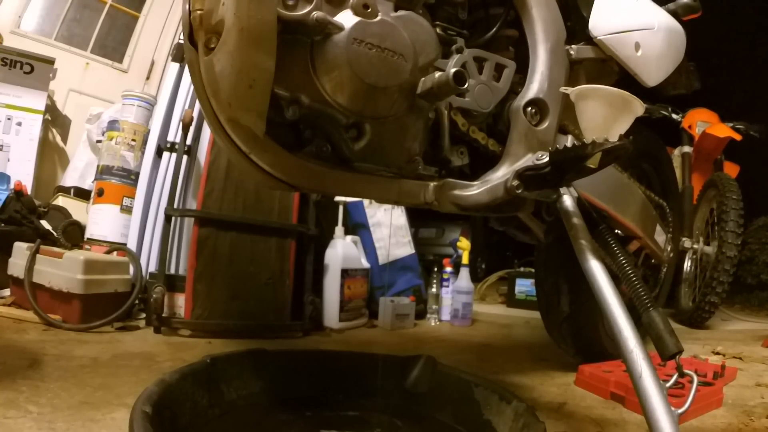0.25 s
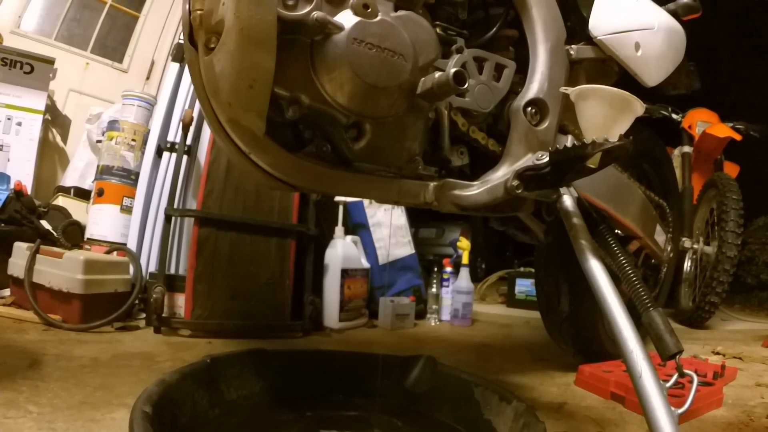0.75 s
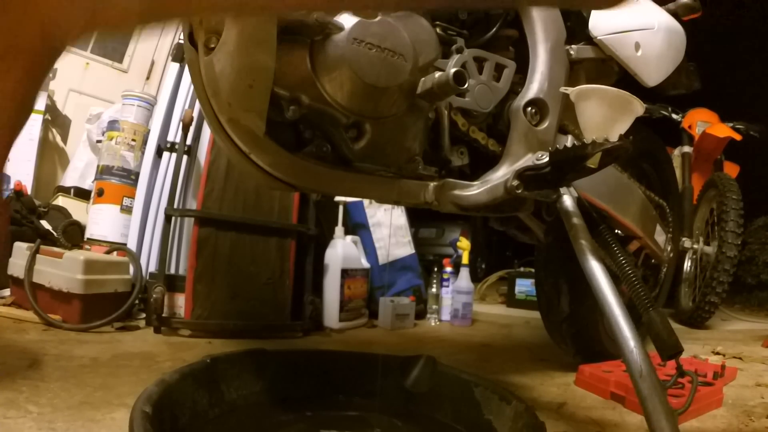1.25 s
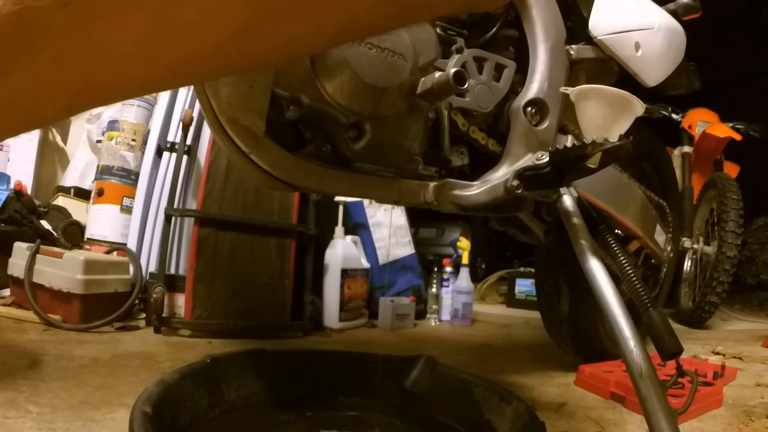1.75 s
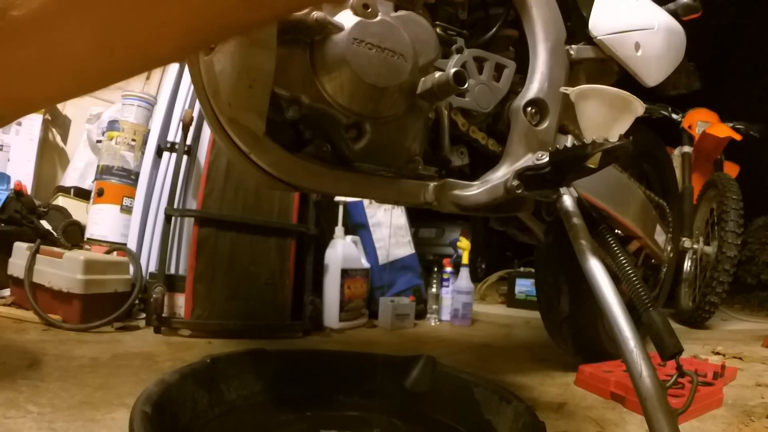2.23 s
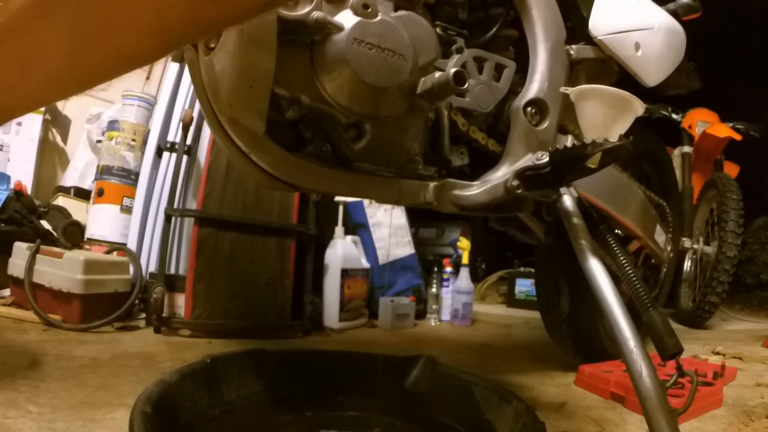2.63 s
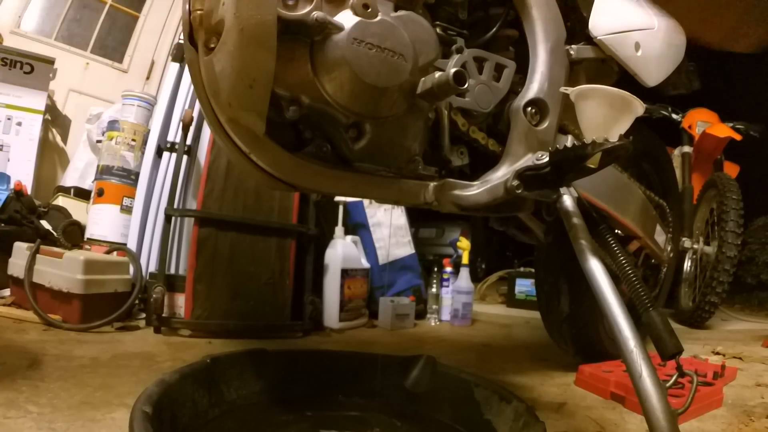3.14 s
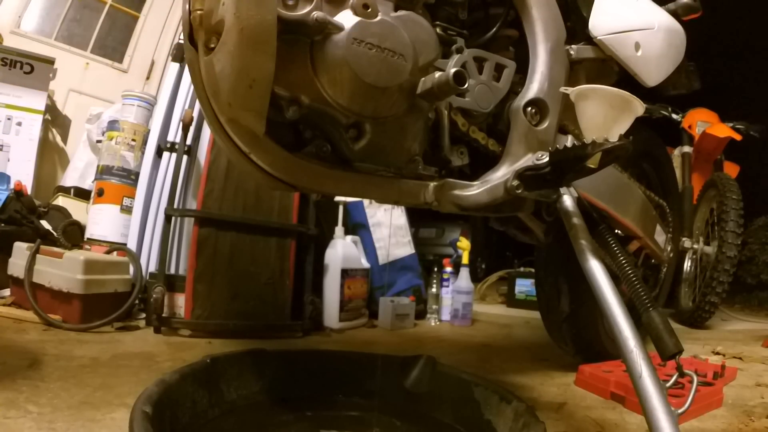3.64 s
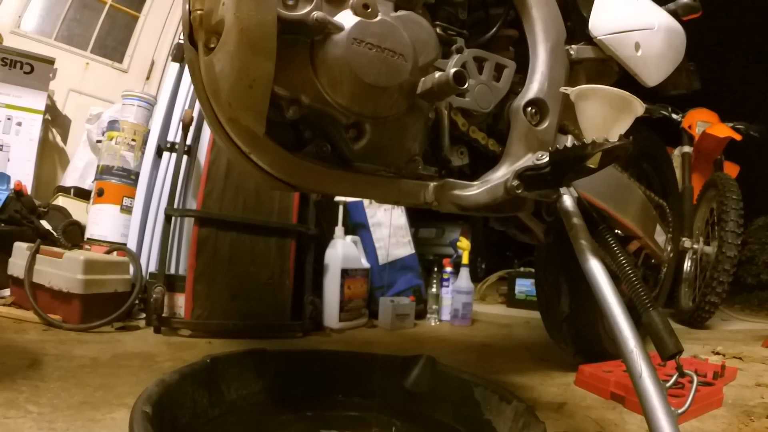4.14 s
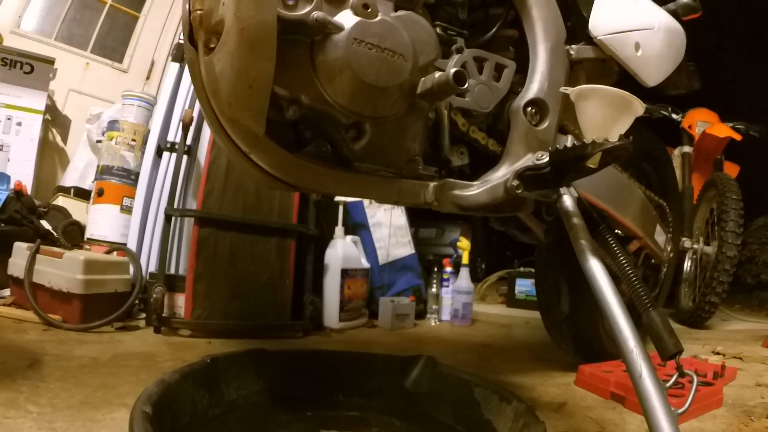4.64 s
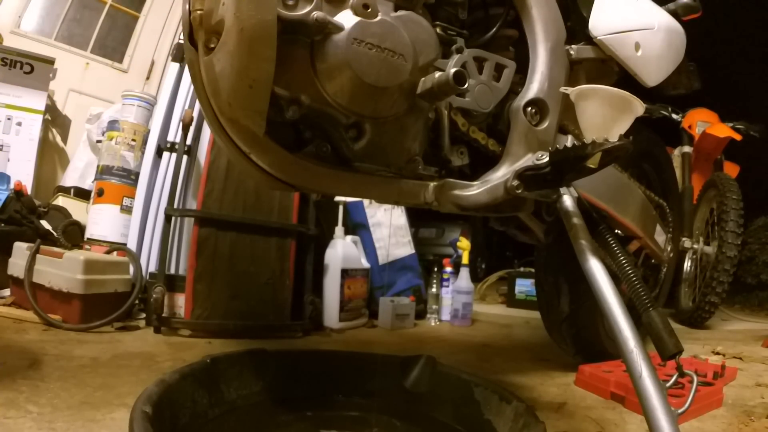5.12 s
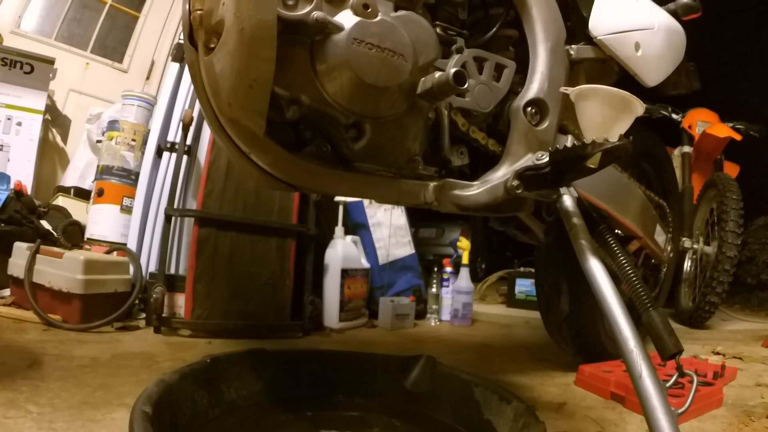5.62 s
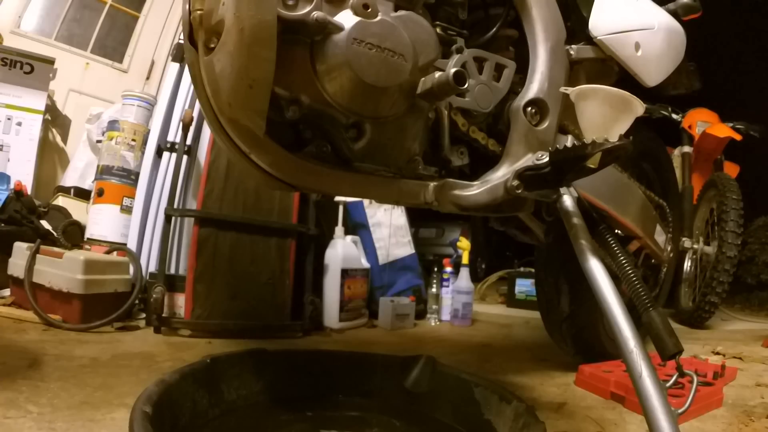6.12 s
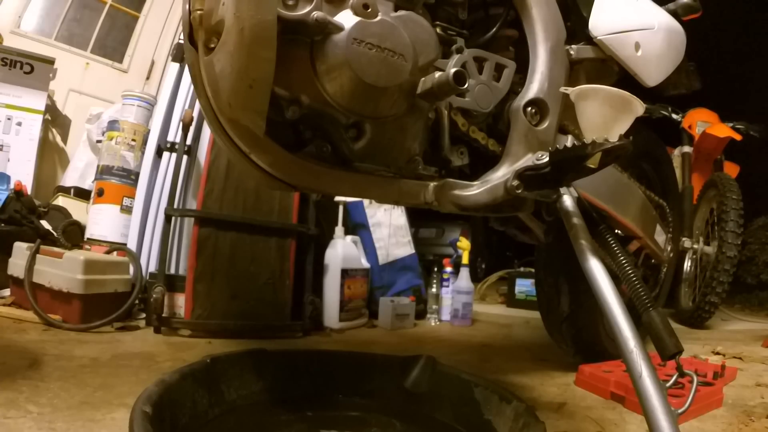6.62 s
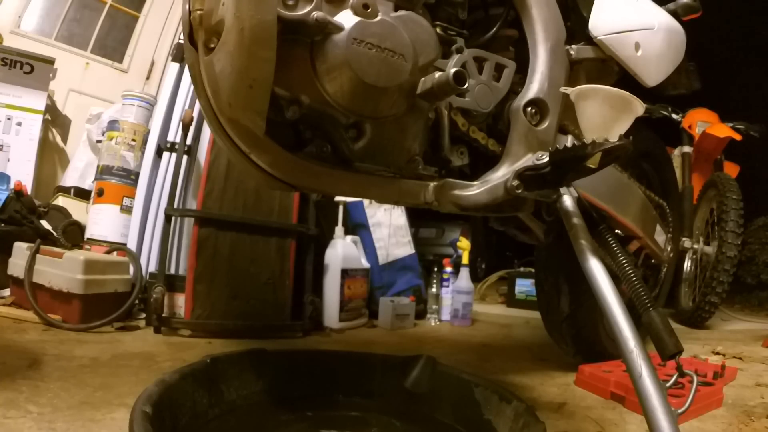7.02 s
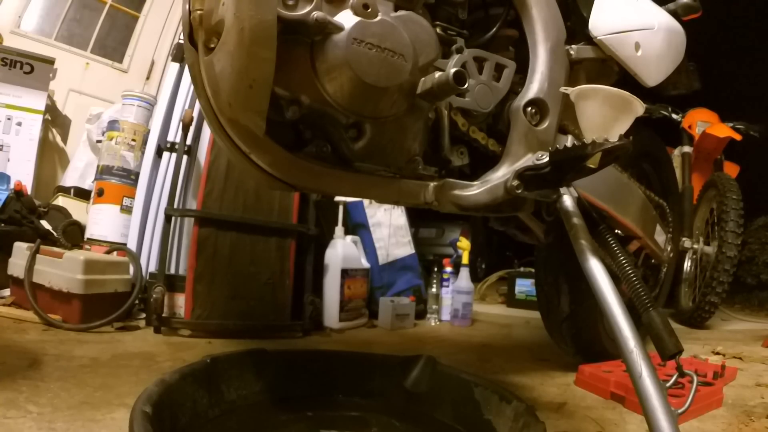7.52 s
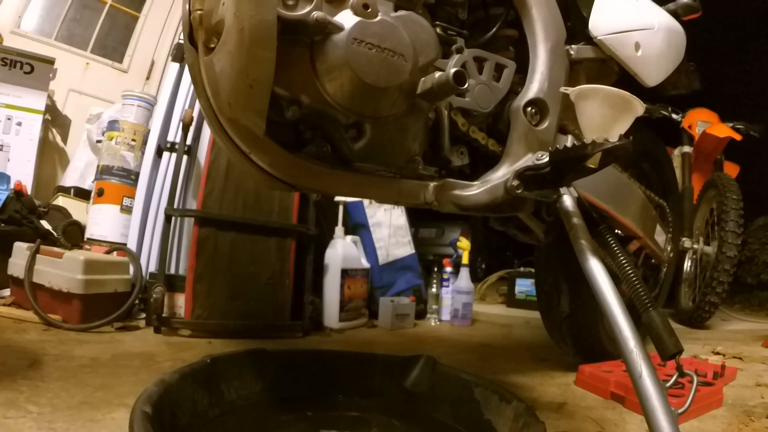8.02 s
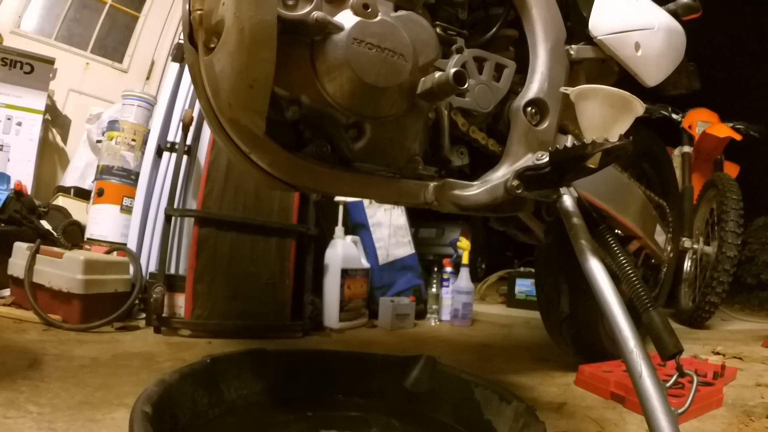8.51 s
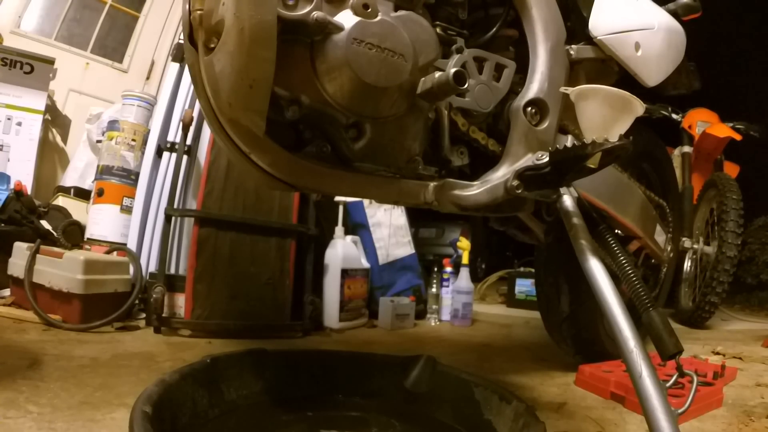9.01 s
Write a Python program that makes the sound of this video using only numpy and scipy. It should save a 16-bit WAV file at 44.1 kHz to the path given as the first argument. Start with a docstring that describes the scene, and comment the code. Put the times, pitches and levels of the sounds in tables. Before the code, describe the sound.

Oil trickles in fast hollow drops in a quiet garage as a steel tool lands and rings, plastic snaps, and a low hum swells.

```python
"""Oil is poured from a plastic jug into a motorcycle engine, above a drain pan in a quiet garage.
From the start it trickles as many small drops, each a noise impact ringing a hollow whose pitch climbs overall,
with hands rubbing and bumping (filtered grit), a low hum (two sines) and room air (shaped noise).
Soon knocks and scuffs begin (damped noise) and a steel tool lands and rings (decaying sines) amid puffs of air;
later plastic snaps (noise bursts), a faint hollow tone passes (filtered noise), and the hands come to rest."""
import sys
import numpy as np
from scipy import signal
from scipy.fft import rfft, irfft
from scipy.io import wavfile
from scipy.ndimage import uniform_filter1d

SR = 44100
rng = np.random.default_rng(int(sys.argv[2]) if len(sys.argv) > 2 else 0)


def transcribe(u):
    """Save the signal u as a 16-bit wav file named by the first command-line argument.

    u: samples, shape (n,) or (channels, n), limited to [-1, 1]; the rate is SR.
    q: integer samples, one column per channel.
    """
    v = np.clip(np.atleast_2d(u).T, -1, 1)
    q = np.round(v * 32767).astype(np.int16)
    wavfile.write(sys.argv[1], SR, q)


N = 408366
TIME = np.arange(N) / SR

# All spectra and all levels called relative are shifted by gains in the functions.
# distinct drips: [t/s, relative hollow level/dB, relative splash level/dB]
DISTINCT_DRIPS = [(.1174, -40, -49), (.7526, -35, -48), (1.0264, -61, -42.5), (1.2106, -38.5, -61),
                  (1.6275, -42, -43.5), (1.7185, -39, -41.5), (2.172, -38, -50), (2.4057, -40, -60),
                  (2.8384, -42, -61), (2.9234, -41.5, -62), (3.1326, -47, -54), (3.336, -68, -47.5),
                  (3.3563, -58, -41.5), (3.374, -60, -37.5), (3.3873, -62, -49), (3.6361, -43, -48.5),
                  (4.2775, -44, -51), (4.558, -45, -52), (4.7207, -39, -53), (4.7633, -47.5, -54),
                  (4.8648, -52, -54), (4.9232, -66, -54), (5.1876, -47, -55), (5.3632, -41, -57),
                  (5.3913, -44.5, -53), (5.4495, -46, -54), (5.4949, -41.5, -58), (5.7452, -53, -51),
                  (6.0048, -50, -51), (6.077, -49, -53.5), (6.631, -48.5, -63), (6.7156, -49, -56),
                  (6.8332, -41, -51), (6.982, -49.5, -53.5), (7.0364, -50, -67), (7.0882, -46, -55),
                  (7.101, -45, -57), (7.1407, -48, -61), (7.1896, -48, -51), (7.1993, -45, -57),
                  (7.265, -48.5, -66), (7.3447, -42, -53), (7.3986, -44.5, -61), (7.4716, -48.5, -69),
                  (7.6434, -45, -53), (7.6715, -47, -57), (7.6889, -39, -54), (7.8334, -48, -51),
                  (7.8785, -47, -49.5), (7.9136, -49, -54), (7.9603, -47, -51), (8.0388, -51, -55),
                  (8.23, -45, -53.5), (8.327, -48, -65), (8.5121, -48.5, -63), (8.5584, -50, -61),
                  (8.8453, -49.5, -70), (9.047, -54, -62), (9.2373, -66, -56)]
# resonances of the hollow that the oil falls into: [t/s, main f/Hz, upper f/Hz]
HOLLOW_PITCH = [(0, 2050, 3400), (1.4, 2240, 3340), (3.2, 2265, 3580), (3.42, 2870, 3840),
                (3.65, 2330, 3520), (3.86, 1640, 3880), (4.05, 2370, 5340), (4.3, 2570, 3300),
                (4.7, 2890, 3640), (5.1, 2880, 3830), (6.25, 3070, 4050), (6.75, 3830, 3900),
                (7.2, 3550, 3800), (9.26, 3630, 3810)]
# those two modes in a thin flow, main then upper: [width of one filter pass/Hz, relative level/dB]
HOLLOW_MODES = [(320, 0), (650, -4)]
# spectrum of bright splashes and sharp edges: [f/Hz, relative level/dB]
BRIGHT_SPECTRUM = [(300, -47), (1500, -52.5), (2600, -9), (4300, 3), (5600, 0.5), (6800, 6.5), (7400, 2),
                   (8200, 6), (10500, 2.5), (12500, 0.5), (15000, -7)]
# strength of the oil flow: [t/s, relative level of the small drops/dB]
OIL_FLOW = [(0, -57), (.7, -53), (2.2, -52), (2.6, -57), (3, -53), (3.25, -61), (3.8, -52), (4.15, -60),
            (5.45, -61), (5.7, -66), (6.1, -62), (6.55, -68), (6.8, -61.5), (7.9, -60.5), (8.6, -68),
            (9.26, -64)]
# fidgeting of hands, sleeves and jug: [t/s, relative friction level/dB, relative thud level/dB]
FIDGETING = [(0, -64, -66.5), (.6, -59, -50), (1.7, -64.5, -61), (2.5, -69.5, -75.5), (3.7, -68, -58.5),
             (4.8, -69.5, -76), (5.7, -74, -70)]
# nudges of the jug: [t/s, relative friction level/dB, relative thud level/dB]
JUG_NUDGES = [(.43, -42, -37), (.58, -67, -56), (.77, -56.5, -55), (1.25, -52, -47), (1.42, -61, -47),
              (2.15, -65, -65), (3.06, -62.5, -55), (3.149, -62.5, -54.5), (3.52, -55.5, -54),
              (3.81, -56, -51.5), (4.39, -58, -45.5), (4.68, -97, -49.5)]
# spectrum of friction: [f/Hz, relative level/dB]
RUB_SPECTRUM = [(150, -25), (500, 2), (1400, 0), (3000, -2), (6000, -6), (9000, -9), (15000, -15.5)]
# spectrum of dull bumps: [f/Hz, relative level/dB]
THUD_SPECTRUM = [(20, 4.5), (60, 6.5), (110, 1.5), (180, 1), (330, -1), (500, -17), (1200, -43.5)]
# level of the hum: [t/s, level/dB]
HUM_LEVEL = [(0, -60), (1.3, -61), (2.5, -78), (3.7, -60), (5.2, -57), (5.9, -49.5), (6.9, -52),
             (7.5, -50.5), (9.26, -53)]
# pitch of the hum, sagging as it grows louder: [t/s, f/Hz]
HUM_PITCH = [(5, 90.4), (5.9, 88.7), (9.26, 88)]
# spectrum of the garage air: [f/Hz, relative level per Hz/dB]
AIR_SPECTRUM = [(15, 7.5), (25, -1), (42, -7), (70, -7.5), (110, -10.5), (170, -16), (250, -26.5),
                (500, -29), (1100, -32.5), (2200, -36), (5000, -38.5), (10000, -42), (12000, -36),
                (15500, -38.5)]
# knocks, with a rub at 1.24 s and the ringing of flexing plastic at 2.08 and 2.10 s: [t/s, thump level/dB,
# thump f/Hz, thump T60/s, relative clack level/dB, clack T60/s]
CONTACT_EVENTS = [(0.2508, -42.5, 716, 0.082, -27.5, 0.032), (.565, -46, 320, 0.026, -44.5, .03),
                  (0.785, -45, 162, .055, -52, .03), (.843, -44, 597, 0.054, -40, 0.048),
                  (1.24, -48.5, 303, 0.29, -50, 0.15), (2.081, -40, 1960, .023, -55, .02),
                  (2.1034, -34.5, 1920, 0.02, -56, .02), (3.141, -52.5, 187, 0.088, -54, .032),
                  (3.4967, -40.5, 170, .15, -44, .06), (3.684, -47, 634, .11, -44.5, 0.027),
                  (3.725, -49, 620, 0.14, -45, 0.067), (3.843, -48, 625, 0.19, -46, 0.084),
                  (3.859, -46.5, 305, 0.14, -53, .03), (4.126, -37.5, 144, .1, -48, 0.054),
                  (4.138, -36, 227, .12, -52, 0.035), (4.3733, -41.5, 244, 0.093, -42, .04),
                  (4.372, -39.5, 735, .08, -53, .03)]
# spectrum of a hard contact: [f/Hz, relative level/dB]
CLACK_SPECTRUM = [(200, -2), (450, -4), (750, 2.5), (1200, -2), (1650, 0), (2800, -3), (4500, -7),
                  (8000, -14.5), (15000, -42)]
# strokes of sliding plastic: [start t/s, length/s, level/dB, peak pressure as a share of the length]
SCUFF_STROKES = [(0.252, 0.071, -52.5, .1), (1.834, 0.17, -50.5, 0.27), (1.98, 0.15, -54, .15),
                 (2.559, 0.072, -51, 0.22), (3.507, 0.03, -46.5, 0.36), (3.628, 0.254, -53, 0.88),
                 (4.328, 0.14, -46.5, .8), (4.684, 0.04, -48.5, 0.07)]
# spectrum of sliding plastic: [f/Hz, relative level/dB]
SCUFF_SPECTRUM = [(150, -6.5), (450, -2.5), (1050, 0.5), (1900, 3.5), (3700, -2), (6500, -1.5),
                  (9000, -7.5), (15000, -15)]
# resonances of the rubbed plastic: [f/Hz, width/Hz, level against the grains/dB]
SCUFF_RESONANCES = [(590, 63, -30), (1115, 230, -17), (1690, 280, -15.5), (2610, 110, -18),
                    (3590, 110, -10.5)]
# modes of the heavy body that the tool lands on: [f/Hz, level at the landing/dB, T60/s]
BODY_MODES = [(105, -26.5, 0.13), (172, -31, 0.175), (254, -29, 0.086), (780, -32.5, 0.069),
              (2110, -32, 0.053)]
# modes of the steel tool: [f/Hz, level/dB, T60/s, time constant of its fade-in/s]
STEEL_MODES = [(867, -45, .4, .001), (1589, -42, .9, .017), (2728, -48, 1.4, .018), (2881, -45, 3.4, .03),
               (3170, -43, .89, .019), (3725, -34, .56, .015), (4587, -35, .9, .012), (4588, -45, 2.7, .3),
               (5356, -44, .82, .023), (5357, -54, 3.2, .1), (5442, -45, .86, .017), (5819, -33, .3, .008),
               (6594, -28, .76, .004), (7220, -35, .52, .15), (7746, -45, .78, .009),
               (8372, -19.5, .52, .15), (9523, -45, .55, .013), (9857, -36, .58, .007),
               (10680, -38, .44, .071), (10780, -34, .38, .15), (11270, -45, .55, .03),
               (12420, -35, .38, .15), (13572, -24, .36, .15), (14750, -31, .41, .15)]
# puffs of air over the microphone: [t/s, level before the low-pass/dB, f/Hz, rise/s, fall/s]
AIR_PUFFS = [(.39, -34, 27.4, 0.021, 0.051), (2.081, -28, 26.5, 0.027, 0.013),
             (2.19, -41.5, 24, 0.073, .13)]
# snaps of flexing plastic: [t/s, relative body level/dB, relative bright edge level/dB]
PLASTIC_SNAPS = [(1.8648, -31, -38), (1.8924, -31, -36), (1.9103, -27.5, -34), (1.9242, -36.5, -52),
                 (1.944, -28.5, -36), (1.979, -29, -33), (2.0044, -38, -35), (2.0249, -32, -32),
                 (2.0928, -35.5, -49), (2.1007, -35.5, -56), (2.1046, -41, -36.5), (2.56, -48, -57),
                 (2.584, -36, -30)]
# spectrum of the plastic wall: [f/Hz, relative level/dB]
PLASTIC_SPECTRUM = [(300, -8), (800, -30), (1030, 10.5), (1300, 1.5), (2100, 6), (2700, 2.5), (3500, 7),
                    (4300, 10), (5000, -4.5), (8000, -5), (15000, -40)]
# spectrum of a faint decaying side signal: [f/Hz, relative level/dB]
SIDE_SPECTRUM = [(25, 20), (70, -11), (150, -43), (350, -70), (700, -49), (1400, -54), (2800, -59),
                 (6000, -67), (15000, -62)]

DROPS_PER_S, GAP_SPREAD = 72, .33  # median small-drop rate/(1/s); spread of the gaps (log ratio)
DROP_SPREAD_DB, DROP_TOP_DB = 3.8, 6.5  # scatter of the small drops' levels and its ceiling/dB
SURGE_DROPS, SURGE_DB = 6, 3.5  # length of a cluster (drops); its rms level swing/dB
THIN_DB, WIDTH_DOUBLING_DB = -63, 20  # thin flow level/dB; extra flow that doubles the mode widths/dB
PITCH_SCATTER = .009  # from drop to drop (log ratio)
TICK_SPAN_HZ = 1000  # reach of the dry tick above the main resonance
HANDS_REST_S, HANDS_FADE_S = 6.8, 0.98  # fidgeting is silent from here; length of the fade before it
NUDGE_RISE_S, NUDGE_FALL_S = 0.025, 0.022  # time constants
TOUCH_S, TOUCH_DB = .369, -4.5  # light first touch: time, level against the landing
LAND_S, LAND_CLACK_DB = .378, -30.5  # landing: time, clack level before its spectrum is applied
CLINK_S = .3745


def amp(db):
    """Logarithmic level: decibels become an amplitude ratio."""
    return 10 ** (np.asarray(db) / 20)


def unit(x):
    """Power normalisation to an rms of 1."""
    return x / np.sqrt(np.mean(x ** 2) + 1e-20)


def crest(x, size=130):
    """Short-time power normalisation: the loudest window of `size` samples has an rms of 1."""
    return x / np.sqrt(uniform_filter1d(x ** 2, size).max() + 1e-20)


def curve(rows, s, axis=1):
    """Linear interpolation of one table column over time."""
    rows = np.array(rows)
    return np.interp(s, rows[:, 0], rows[:, axis])


def read(points, hz):
    """Interpolation of a spectrum on a log-frequency axis."""
    f, value = np.transpose(points)
    return np.interp(np.log(hz + 1), np.log(f + 1), value)


def add(mix, s, sound):
    """Superposition: adds a sound to the mix from time s."""
    part = mix[max(round(s * SR), 0):][:len(sound)]
    part += sound[:len(part)]


def colour(x, points, size=4096):
    """Minimum-phase filtering: a causal response of the given spectrum keeps attacks sharp."""
    hz = abs(np.fft.fftfreq(size, 1 / SR))
    log_gain = np.log(amp(read(points, hz)))
    response = np.exp(np.conj(signal.hilbert(log_gain)))
    taps = np.fft.ifft(response).real[:size // 2]
    return signal.oaconvolve(x, taps / np.linalg.norm(taps))[:len(x)]


def resonate(x, hz, width_hz):
    """Second-order resonance with a gain of 1 at its peak."""
    return signal.lfilter(*signal.iirpeak(hz, hz / width_hz, SR), x)


def burst(t60, echo_db, echo_t60, length):
    """Exponential decay: a dense flurry of impacts dies fast over weaker scatter from nearby surfaces."""
    t = np.arange(int(length * SR)) / SR
    envelope = amp(-60 * t / t60) + amp(echo_db - 60 * t / echo_t60)
    return rng.standard_normal(len(t)) * envelope


def grit(rate, spread_db):
    """Shot noise: random tiny impacts of uneven size, `rate` a second on average, scaled to rms 1."""
    size = amp(spread_db * np.minimum(rng.exponential(1, N), 4))
    struck = rng.random(N) < rate / SR
    return unit(rng.standard_normal(N) * size * struck)


def swell(s, rise, fall):
    """Two-sided exponential envelope that grows towards a moment and dies away after it."""
    return np.exp(-abs(TIME - s) / np.where(TIME < s, rise, fall))


def drip(s, db, splash_db, hollow_db=-8.0, bright_db=-2, bubble_db=6, bubble_hz=7000, tick_db=-6):
    """Cavity resonance: an impact rings the hollow at its present pitch; a splash bursts one tiny bubble."""
    hit = burst(t60=.006, echo_db=-19, echo_t60=.08, length=.064)
    pitch = curve(HOLLOW_PITCH, s)
    tick_band = signal.butter(2, [pitch, pitch + TICK_SPAN_HZ], "bandpass", fs=SR)
    ring = amp(tick_db) * crest(signal.lfilter(*tick_band, hit))
    # a thick flow damps the hollow
    churn = 2 ** ((curve(OIL_FLOW, s) - THIN_DB) / WIDTH_DOUBLING_DB)
    for k, (width, level) in enumerate(HOLLOW_MODES):
        hz = curve(HOLLOW_PITCH, s, axis=k + 1) * np.exp(PITCH_SCATTER * rng.standard_normal())
        mode = resonate(resonate(hit, hz, width * churn), hz, width * churn)
        # where the drop lands decides how much each resonance gets
        ring = ring + amp(level + 2 * rng.standard_normal()) * crest(mode)
    # the hollow lets out little below its pitch
    ring = signal.lfilter(*signal.butter(6, .9 * pitch, "highpass", fs=SR), ring)
    spray = burst(t60=.01, echo_db=-17, echo_t60=.13, length=.064)
    bubble = resonate(spray, bubble_hz * np.exp(0.43 * rng.uniform(-1.37, 1)), 480)
    splash = crest(spray + amp(bubble_db) * bubble)
    return amp(db + hollow_db) * crest(ring), amp(splash_db + bright_db) * splash


def oil(small_db=4.0, small_splash_db=-6.0, splash_growth=1.2, splash_spread_db=4.5, count=900):
    """Random point process: distinct drips over clustered small ones; a thick flow splashes more."""
    gap, size, splash, surge = rng.standard_normal((count, 4)).T
    times = np.cumsum(np.exp(GAP_SPREAD * gap)) / DROPS_PER_S
    flow = curve(OIL_FLOW, times)
    # the thread sputters: neighbouring drops share a surge
    cluster = SURGE_DB * unit(uniform_filter1d(surge, SURGE_DROPS))
    size = np.minimum(DROP_SPREAD_DB * size + cluster, DROP_TOP_DB)
    splash = THIN_DB + splash_growth * (flow - THIN_DB) + splash_spread_db * np.minimum(splash, 1.5)
    patter = np.transpose([times, flow + size + small_db, splash + size + small_splash_db])
    rings, splashes = np.zeros((2, N))
    for row in [*DISTINCT_DRIPS, *patter[times < N / SR]]:
        ring, spray = drip(*row)
        add(rings, row[0], ring)
        add(splashes, row[0], spray)
    return rings + colour(splashes, BRIGHT_SPECTRUM)


def handling(rub_db=2, thud_db=-3):
    """Friction as shot noise: grit and dull bumps swell with each nudge; the fidgeting fades to rest."""
    busy = np.clip((HANDS_REST_S - TIME) / HANDS_FADE_S, 0, 1)
    rub = busy * amp(curve(FIDGETING, TIME))
    thud = busy * amp(curve(FIDGETING, TIME, axis=2))
    for s, friction_db, bump_db in JUG_NUDGES:
        push = swell(s, NUDGE_RISE_S, NUDGE_FALL_S)
        rub = rub + amp(friction_db) * push
        thud = thud + amp(bump_db) * push
    friction = colour(grit(rate=2200, spread_db=2.4), RUB_SPECTRUM)
    bumps = colour(grit(rate=600, spread_db=1.5), THUD_SPECTRUM)
    return amp(rub_db) * rub * friction + amp(thud_db) * thud * bumps


def hum(octave_db=-27):
    """Harmonic tone: a low machine drone of a fundamental and a weak octave, varying in level."""
    turns = np.cumsum(curve(HUM_PITCH, TIME)) / SR
    tone = np.sin(2 * np.pi * turns) + amp(octave_db) * np.sin(4 * np.pi * turns)
    return amp(curve(HUM_LEVEL, TIME)) * unit(tone)


def air(level_db=-67, low_hz=150, apart_db=-7, apart_hz=60):
    """Stationary noise: rumble and hiss of the garage; the channels differ mostly in deep rumble."""
    hz = np.fft.rfftfreq(N, 1 / SR)
    mid, side = rfft(rng.standard_normal((2, N))) * amp(read(AIR_SPECTRUM, hz))
    side = side * amp(apart_db) / (1 + (hz / apart_hz) ** 2)
    # the level is that of the common part above low_hz
    reference = irfft(mid * (hz > low_hz), N).std()
    return amp(level_db) * irfft([mid + side, mid - side], N) / reference


def thump(db, hz, t60, damping=0.22, reach=1.73):
    """Damped resonance: a blow excites one broad mode, dull above its pitch."""
    push = burst(t60=t60, echo_db=-44, echo_t60=0.3, length=.4)
    body = signal.lfilter(*signal.butter(3, reach * hz, fs=SR), resonate(push, hz, hz * damping))
    return amp(db) * crest(body, size=400)


def clack(db, t60):
    """Impulsive contact: a short hard blow with a little scatter from nearby surfaces."""
    contact = burst(t60=t60, echo_db=-18, echo_t60=.17, length=.25)
    return amp(db) * colour(crest(contact), CLACK_SPECTRUM)


def contacts():
    """Impact excitation: each contact, whether knock, rub or plastic snap, gives a damped thump and a short
    hard clack."""
    out = np.zeros(N)
    for s, thump_db, hz, t60, clack_db, clack_t60 in CONTACT_EVENTS:
        add(out, s, thump(thump_db, hz, t60))
        add(out, s, clack(clack_db, clack_t60))
    return out


def scuffs():
    """Stick-slip friction: grains ring the plastic under a stroke that swells and lets go."""
    pressure = np.zeros(N)
    for s, length, db, top in SCUFF_STROKES:
        peak = s + length * np.clip(top, .02, .98)
        pressure += amp(db) * np.sqrt(np.interp(TIME, [s, peak, s + length], [0, 1, 0]))
    sound = grit(rate=2900, spread_db=0.5)
    for hz, width, db in SCUFF_RESONANCES:
        # each resonance is caught by its own sparse slips
        slips = grit(rate=280, spread_db=5.0)
        sound = sound + amp(db) * unit(resonate(slips, hz, width))
    return pressure * unit(colour(sound, SCUFF_SPECTRUM))


def landing(clack_t60=0.097):
    """Modal excitation by impact: the tool touches, then lands, and both shake the body under it."""
    out = np.zeros(N)
    for s, force_db in [(TOUCH_S, TOUCH_DB), (LAND_S, 0)]:
        add(out, s, clack(LAND_CLACK_DB + force_db, clack_t60))
        for hz, db, t60 in BODY_MODES:
            add(out, s, thump(db + force_db, hz, t60))
    return out


def clink(after_db=-23, after_t60=5.1, after_hz=5700, strike_db=-27):
    """Modal sum for steel: each mode fades in with its own time constant; the lower ones linger softly."""
    t = np.arange(2 * SR) / SR
    out = np.zeros(len(t))
    for hz, db, t60, fade_in_s in STEEL_MODES:
        main = amp(db - 60 * t / t60)
        after = amp(db + after_db - 60 * t / after_t60) / (1 + (hz / after_hz) ** 20)
        envelope = np.hypot(main, after) * (1 - np.exp(-t / fade_in_s))
        out += envelope * np.sin(2 * np.pi * (hz * t + rng.random()))
    strike = crest(burst(t60=.04, echo_db=-22, echo_t60=.45, length=.5))
    add(out, 0, amp(strike_db) * colour(strike, BRIGHT_SPECTRUM))
    mix = np.zeros(N)
    add(mix, CLINK_S, out)
    return mix


def draught(top_hz=42):
    """Flow noise: quick movements push air over the microphone in deep, brief flutters."""
    out = np.zeros(N)
    for s, db, hz, rise, fall in AIR_PUFFS:
        flutter = resonate(rng.standard_normal(N), hz, 8.8)
        out += amp(db) * crest(swell(s, rise, fall) * flutter, size=1500)
    return signal.sosfilt(signal.butter(4, top_hz, fs=SR, output="sos"), out)


def plastic(body_db=-1, edge_db=-2):
    """Buckling: the thin wall snaps through in quick bursts that die at once."""
    body, edge = np.zeros((2, N))
    for s, db, bright_db in PLASTIC_SNAPS:
        wall = burst(t60=0.015, echo_db=-9, echo_t60=0.11, length=.15)
        add(body, s, amp(db + body_db) * crest(wall))
        snap = burst(t60=0.016, echo_db=-19.5, echo_t60=0.17, length=.1)
        add(edge, s, amp(bright_db + edge_db) * crest(snap))
    return colour(body, PLASTIC_SPECTRUM) + colour(edge, BRIGHT_SPECTRUM)


def hollow_tone(s=5.63, length=0.1, hz=520, db=-70):
    """Narrow-band noise: two passes of one resonance under a bell envelope give a faint hollow tone."""
    tone = resonate(resonate(rng.standard_normal(N), hz, 100), hz, 100)
    return amp(db) * np.exp(-((TIME - s) / length) ** 2) * unit(tone)


def widen(x, t60=0.59):
    """Decorrelation: a faint noise-like tail, opposite in sign in the two channels, widens the sound."""
    t = np.arange(SR // 3) / SR
    tail = rng.standard_normal(len(t)) * amp(-60 * t / t60)
    wet = signal.oaconvolve(x, tail / np.linalg.norm(tail))[:N]
    gain = amp(read(SIDE_SPECTRUM, np.fft.rfftfreq(N, 1 / SR)))
    side = irfft(rfft(wet) * gain, N)
    return np.array([x + side, x - side])


def scene():
    """Superposition: the close sounds sit in the centre, over the air of the room."""
    close = oil() + handling() + contacts() + scuffs() + landing() + clink() + plastic() + hollow_tone()
    return widen(close) + hum() + air() + draught()


def record(dry, edge_hz=15450):
    """Band limiting: a linear-phase low-pass removes the highest treble."""
    taps = signal.firwin(401, edge_hz, window=("kaiser", 8), fs=SR)
    return signal.oaconvolve(dry, taps[None], "same")


dry = scene()
out = record(dry)
transcribe(out)
```